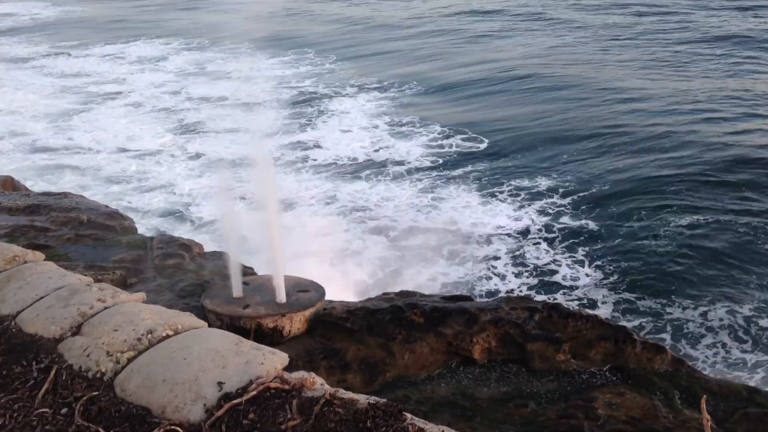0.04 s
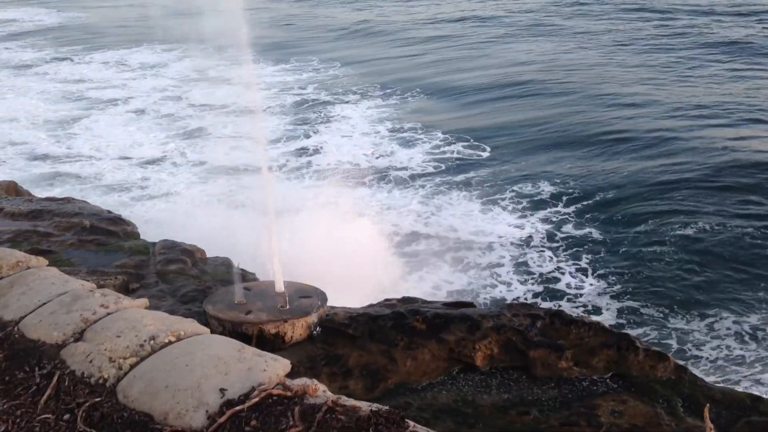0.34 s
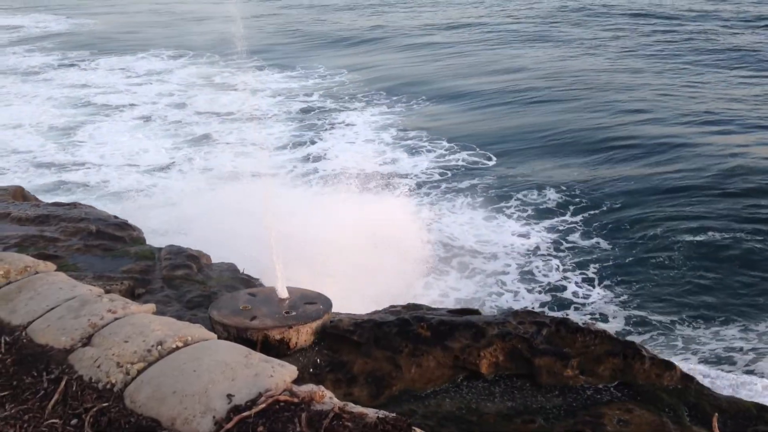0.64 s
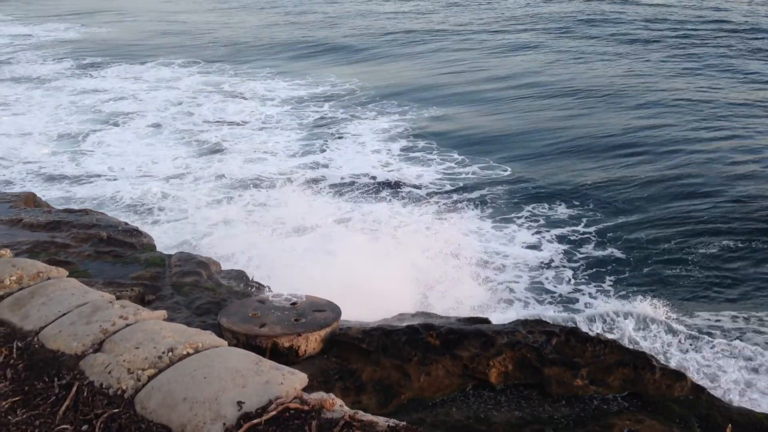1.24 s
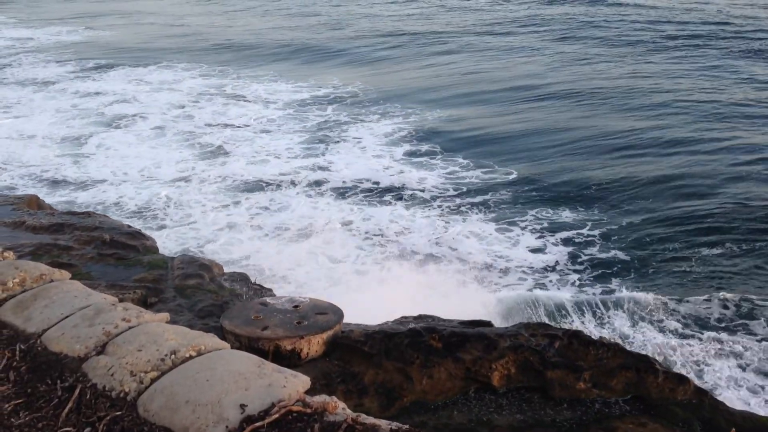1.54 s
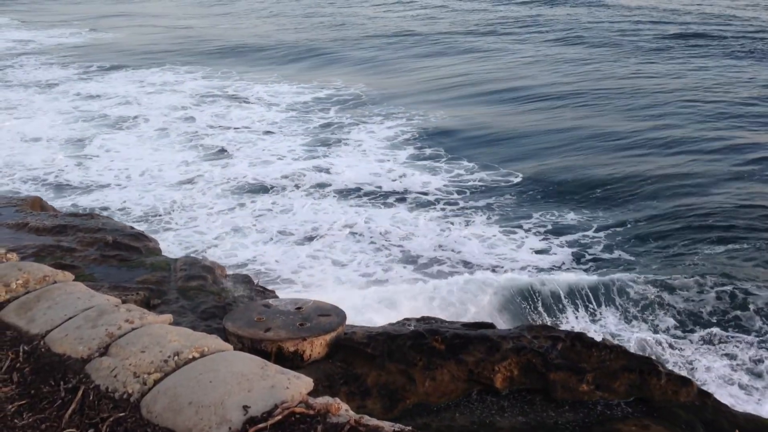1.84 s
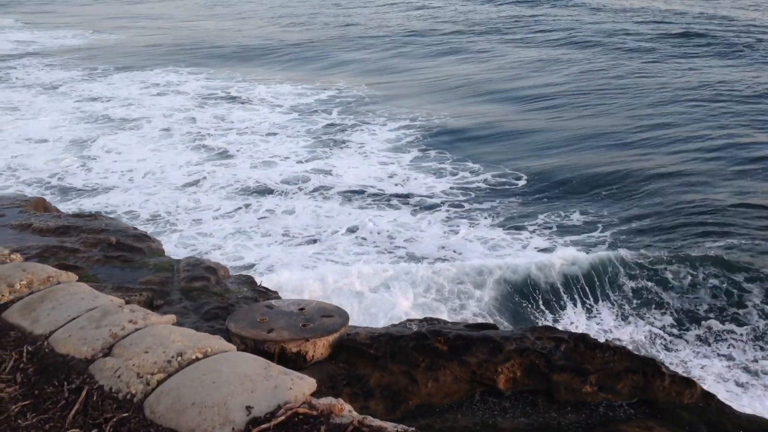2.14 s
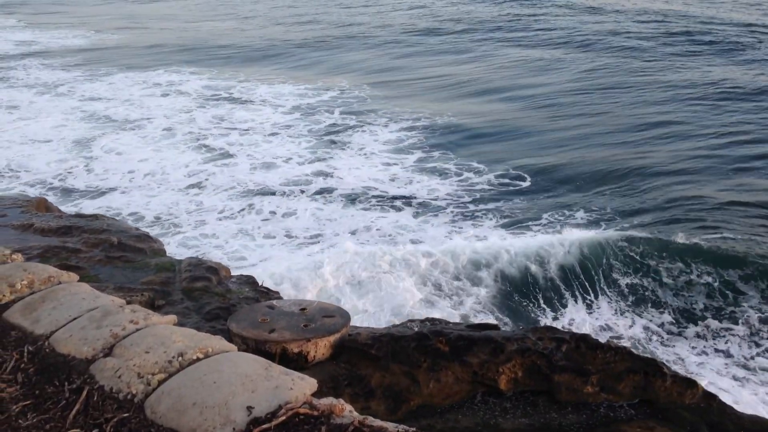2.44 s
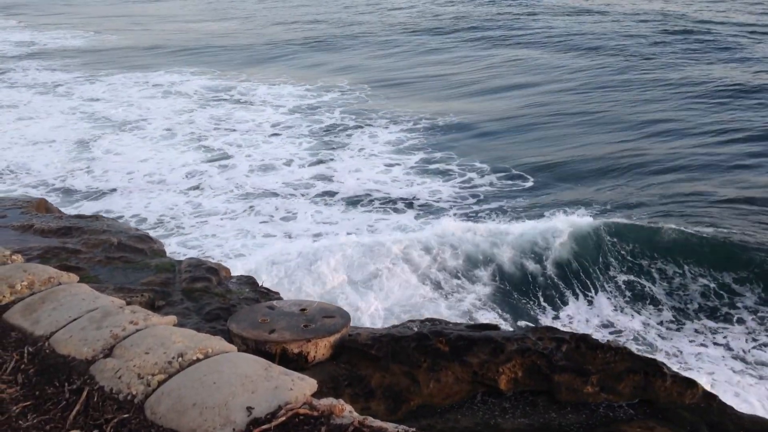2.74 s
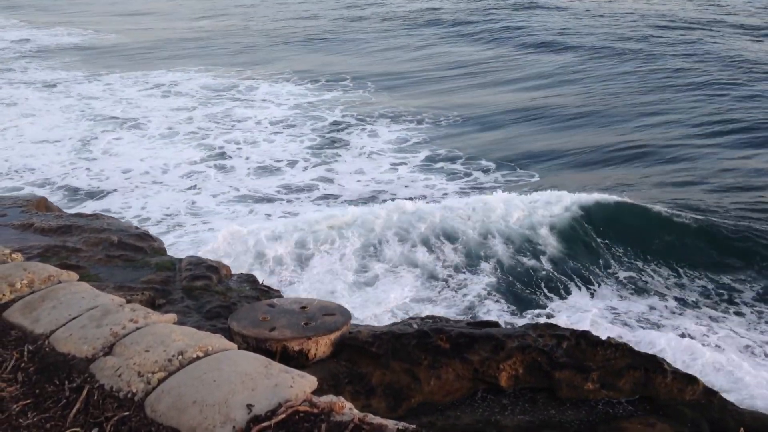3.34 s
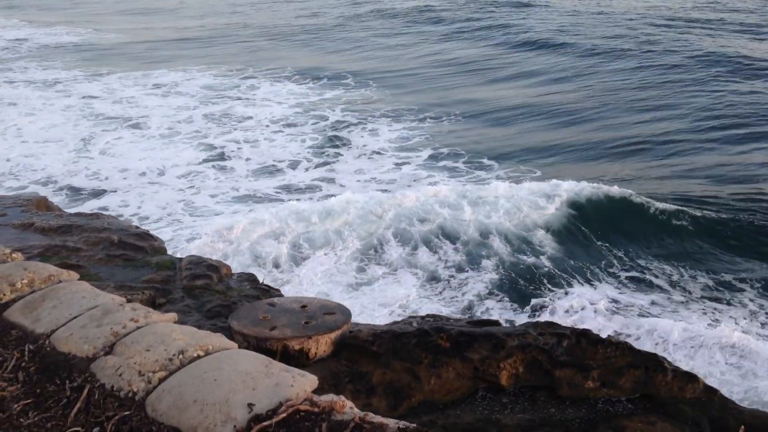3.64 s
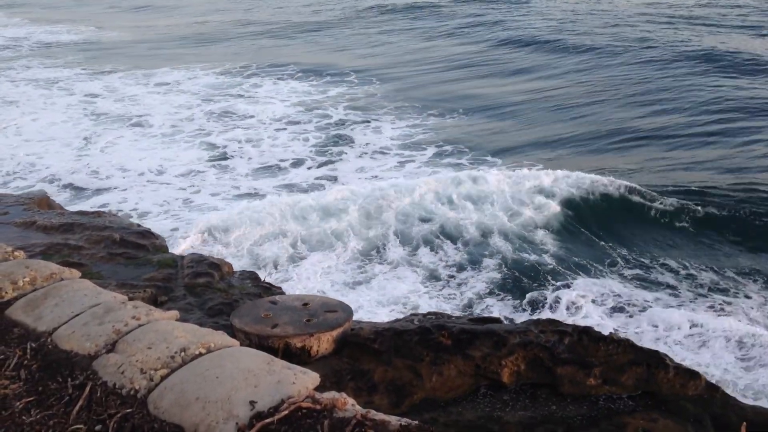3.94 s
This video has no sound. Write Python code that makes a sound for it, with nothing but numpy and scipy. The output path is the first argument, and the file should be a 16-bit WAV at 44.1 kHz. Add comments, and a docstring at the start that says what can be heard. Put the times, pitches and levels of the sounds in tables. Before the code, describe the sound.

A loud, brief rush of air and water vents from a blowhole straight ahead. Gentler ocean surf follows, washing and thudding against the rocks, while thrown water lands first as fine spray, then as close, pattering drops.

```python
"""A sudden rush of air and spray from a blowhole in a rocky shore, venting through its holed cap.
The sea cave booms as it empties; the pressure runs out and a thin whistle sinks with it. Below, surf
rumbles, thuds and washes on. The thrown water comes down as two showers of fine spray, then as heavy
drops on the rock near the microphone, while the next wave breaks and fizzes. Mono, straight ahead."""
import sys
import numpy as np
from scipy import signal
from scipy.fft import rfft, irfft
from scipy.io import wavfile
from scipy.ndimage import uniform_filter1d

SR = 44100
rng = np.random.default_rng(int(sys.argv[2]) if len(sys.argv) > 2 else 0)


def master(y):
    """Save y as 16-bit WAV."""
    cut = np.clip(np.atleast_2d(y).T, -1, 1)
    pcm = np.round(cut * 32767)  # scale
    wavfile.write(sys.argv[1], SR, pcm.astype(np.int16))


N = 176400
T = np.arange(N) / SR

# The jet as its pressure runs out: time_s, level_db
JET_LEVEL = [(0, -13), (.06, -15), (.12, -18), (.18, -22.5), (.24, -29), (.28, -36.5), (.32, -46),
             (.38, -68)]
# Spectrum of the rushing air: frequency_hz, relative_db
JET_SPECTRUM = [(25, -18), (70, -2.5), (130, -2.5), (230, -3.5), (330, 2.5), (440, -3), (550, 0),
                (800, -.5), (1050, -3.5), (2000, -3.5), (2750, -8), (3200, -4), (4300, -6.5), (7000, -8.5),
                (8200, -11.5), (11000, -16), (15500, -22)]
# Resonant peaks in the rushing air: cavity tones, plus the microphone's bright presence near 7.3 kHz:
# pitch_hz, width_hz, relative_db
JET_PEAKS = [(586, 250, -18), (2166, 170, -13.5), (3540, 300, -18.5), (5800, 250, -19.5),
             (7330, 480, -16.5)]
# Showers of fine spray landing: peak_s, rise_s, fall_s, level_db
SPRAY_SHOWERS = [(1.32, 0.22, 0.14, -42), (1.93, 0.21, 0.2, -37)]
# Spectrum of the landing spray: frequency_hz, relative_db
SPRAY_SPECTRUM = [(400, 1.5), (1000, -5.5), (2000, -2.5), (3700, .5), (5500, -1.5), (7300, -2),
                  (8300, -5.5), (10000, -8), (15500, -17)]
# Heavy drops on the near rock: start_s, level_db, centre_hz
HEAVY_DROPS = [(2.2652, -29, 6000), (2.2986, -33, 5500), (2.5705, -28, 8000), (2.6159, -24, 7000),
               (2.6215, -23, 8000), (2.6753, -27, 6700), (2.7525, -27, 7500), (2.7725, -27, 5000),
               (2.8169, -24, 7000), (2.8489, -26, 4500), (2.9112, -26, 6900), (2.9342, -21, 6500),
               (2.9591, -29, 9000), (2.9766, -28, 5600), (3.003, -28, 8500), (3.0634, -25, 5000),
               (3.0908, -26, 6500), (3.1292, -27, 8500), (3.1417, -22, 5500), (3.204, -31, 7000)]
# Deep rumble under the waves: time_s, level_db
RUMBLE_LEVEL = [(0, -44), (.42, -47.5), (.51, -39.5), (.9, -42), (1.35, -40), (2.0, -43), (2.7, -42.5),
                (3.1, -43.5), (3.99, -46)]
# Spectrum of the rumble: frequency_hz, relative_db
RUMBLE_SPECTRUM = [(20, -41), (38, -7), (65, 1), (130, 2), (210, -2.5), (330, -6), (600, -15.5),
                   (1500, -46)]
# Wash of foam on the waves: time_s, level_db
WASH_LEVEL = [(0, -55), (.38, -49), (.55, -45), (1.0, -44), (1.7, -43.5), (2.4, -42.5), (3.2, -41.5),
              (3.85, -41), (4, -42)]
# Spectrum of the wash: frequency_hz, relative_db
WASH_SPECTRUM = [(100, -6), (300, -4.5), (600, 0), (1100, -3.5), (2200, -7.5), (4000, -12), (7000, -19.5),
                 (10000, -25), (15500, -42.5)]
# Waves thudding against the rock: peak_s, level_db
WAVE_THUDS = [(.62, -45), (2.23, -45), (2.65, -45), (3.54, -41.5), (3.95, -42.5)]
# Foam fizzing on the rocks: time_s, level_db
FIZZ_LEVEL = [(0, -62.5), (.9, -57), (1.5, -93), (2.4, -56), (2.7, -50), (3.0, -53.5), (3.3, -52.5),
              (3.52, -50), (4, -59.5)]
# Spectrum of the bursting bubbles: frequency_hz, relative_db
FIZZ_SPECTRUM = [(1500, -49), (4000, -1), (7500, 0.5), (11000, -3.5), (15500, -10)]


def jet():
    """Turbulent air and water, coloured by cavity and microphone; the hiss dulls as pressure falls."""
    dulling, pivot_hz, flutter_db = 0.092, 1440, 0.2  # dulling: dB per octave for each dB lost
    rush = colour(noise(), JET_SPECTRUM)
    peaks = sum(undb(db) * unit(resonate(noise(), hz, 1.5 * width)) for hz, width, db in JET_PEAKS)
    level_db = curve(JET_LEVEL)
    below_peak_db = level_db - level_db.max()
    flow = np.zeros(N)
    for hz, band in octaves(unit(rush + peaks)):
        tilt_db = dulling * below_peak_db * np.log2(max(hz, 125) / pivot_hz)
        flow += band * undb(tilt_db + flutter_db * wander(60))
    return flow * undb(level_db)


def cave_boom():
    """The emptying cave answers with a low hollow note that outlasts the hiss."""
    air = unit(resonate(noise(), hz=193, width_hz=79))
    return air * undb(-27) * swell(peak_s=.15, width_s=.071)


def whistle():
    """The last air whistles unsteadily over the edge of a hole, sinking as it slows."""
    peak_s, pitch_hz, sag_hz_per_s, wobble_hz = .26, 7320, 9500, 90
    hz = np.maximum(pitch_hz - sag_hz_per_s * (T - peak_s) + wobble_hz * wander(700), 0)
    tone = np.sqrt(2) * np.sin(2 * np.pi * np.cumsum(hz) / SR)
    return tone * undb(-44 + 1.5 * wander(200)) * swell(peak_s, width_s=.021)


def spray():
    """Clouds of droplets come down on rock and sea."""
    showers = sum(undb(db) * swell(peak_s, np.where(T < peak_s, rise_s, fall_s))
                  for peak_s, rise_s, fall_s, db in SPRAY_SHOWERS)
    droplets = colour(impacts(per_s=9000, scatter_db=2.5), SPRAY_SPECTRUM)
    return droplets * showers * undb(.35 * wander(24.7))


def drops():
    """Close to the microphone, heavy drops slap the rock amid a patter of lighter ones."""
    splat_s, relative_width, patter_hz, film_hz = .00035, 1.2, 6900, 11900
    splat = np.exp(-T[:512] / splat_s)
    heavy = np.zeros(N)
    for start_s, db, hz in HEAVY_DROPS:
        slap = resonate(rng.standard_normal(len(splat)) * splat, hz, relative_width * hz)
        start = int(start_s * SR)
        heavy[start:start + len(slap)] += undb(db) * slap / np.abs(slap).max()
    landings = np.abs(impacts(per_s=450, scatter_db=1.8))
    light_splats = np.convolve(landings, splat)[:N] * noise()
    patter = unit(resonate(light_splats, patter_hz, relative_width * patter_hz))
    falling = uniform_filter1d(1. * ((T > 2.6) & (T < 3.1)), size=2000)
    water_film = signal.butter(2, film_hz, fs=SR)  # water on the rock softens every slap
    return signal.lfilter(*water_film, heavy + undb(-51.5) * falling * patter)


def surf():
    """Down below, air pockets rumble under the waves and ring the cave; the foam swells and flickers."""
    rumble = flicker(colour(noise(), RUMBLE_SPECTRUM), depth_db=.1, per_s=15)
    cave = undb(-9.5) * unit(resonate(noise(), hz=188, width_hz=47))
    wash = flicker(colour(noise(), WASH_SPECTRUM), depth_db=.4, per_s=18)
    wash_db = curve(WASH_LEVEL) + .15 * wander(6)
    return (rumble + cave) * undb(curve(RUMBLE_LEVEL)) + wash * undb(wash_db)


def thuds():
    """Waves trap air against the rock with dull thuds."""
    air = unit(resonate(noise(), hz=75, width_hz=82))
    return air * sum(undb(db) * swell(peak_s, width_s=.043) for peak_s, db in WAVE_THUDS)


def fizz():
    """Small bubbles burst in the foam on the rocks."""
    bubbles = colour(impacts(per_s=4000, scatter_db=3), FIZZ_SPECTRUM)
    return bubbles * undb(curve(FIZZ_LEVEL))


def undb(db):
    """Decibels to gain."""
    return 10 ** (np.asarray(db) / 20)


def unit(x):
    """Scale to rms 1."""
    return x / np.sqrt(np.mean(x ** 2) + 1e-18)


def curve(rows):
    """Join (time_s, value) rows by straight lines."""
    return np.interp(T, *np.array(rows).T)


def swell(peak_s, width_s):
    """A bell-shaped rise and fall, 1 at its peak."""
    return np.exp(-((T - peak_s) / width_s) ** 2 / 2)


def noise():
    """White noise."""
    return rng.standard_normal(N)


def impacts(per_s, scatter_db):
    """Random tiny impacts: many weak, a few strong."""
    size = undb(scatter_db * np.minimum(rng.exponential(size=N), 5))
    return (rng.random(N) < per_s / SR) * size * np.sign(noise())


def wander(per_s):
    """Random steps smoothed twice into a drift with a spread near 1."""
    hold = int(SR / per_s)
    steps = np.repeat(noise()[:N // hold + 1], hold)
    return 1.3 * uniform_filter1d(uniform_filter1d(steps, hold), hold)[:N]


def colour(x, spectrum):
    """Shape x by (frequency_hz, relative_db) rows, rolled off beyond both ends, at rms 1."""
    hz, db = np.array(spectrum).T
    bin_hz = np.maximum(np.arange(N // 2 + 1) * SR / N, 1)
    skirt = 1 / np.sqrt((1 + (hz.min() / 2 / bin_hz) ** 4) * (1 + (bin_hz / 2 / hz.max()) ** 4))
    gain = undb(np.interp(np.log(bin_hz), np.log(hz), db))
    return unit(irfft(rfft(x) * skirt * gain, N))


def resonate(x, hz, width_hz):
    """Two passes through a resonance, each width_hz wide with gain 1 at its centre."""
    peak = signal.iirpeak(hz, hz / width_hz, fs=SR)
    return signal.lfilter(*peak, signal.lfilter(*peak, x))


def octaves(x):
    """Split x into (centre_hz, band) pairs: overlapping octaves that add up to x."""
    centres = 31.25 * 2 ** np.arange(10)
    bin_hz, spectrum = np.arange(N // 2 + 1) * SR / N, rfft(x)
    return [(hz, irfft(spectrum * np.interp(bin_hz, centres, share), N))
            for hz, share in zip(centres, np.eye(len(centres)))]


def flicker(x, depth_db, per_s):
    """Let each octave of x waver in level on its own; the sum has rms 1."""
    return unit(sum(band * undb(depth_db * wander(per_s)) for _, band in octaves(x)))


def scene():
    """Blowhole, falling water and sea lie straight ahead of the microphone, alike in both channels."""
    shore = jet() + cave_boom() + whistle() + spray() + drops() + surf() + thuds() + fizz()
    return np.tile(shore, (2, 1))


def record(dry):
    """The recorder cuts the top treble steeply."""
    top_hz = 15400
    return signal.sosfilt(signal.ellip(10, .2, 80, top_hz, fs=SR, output="sos"), dry)


dry = scene()
out = record(dry)
master(out)
```